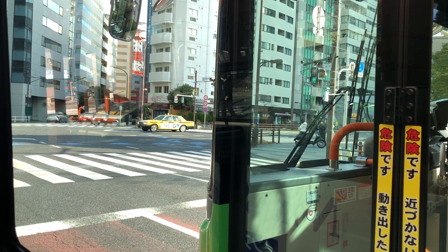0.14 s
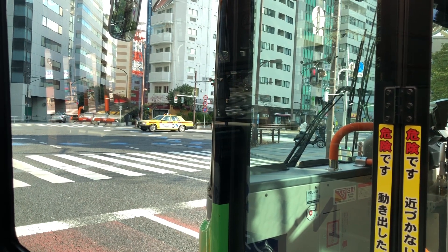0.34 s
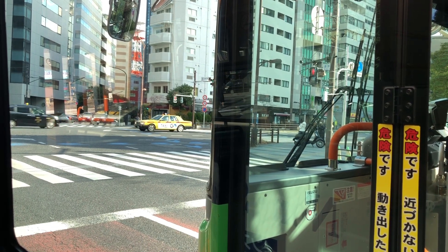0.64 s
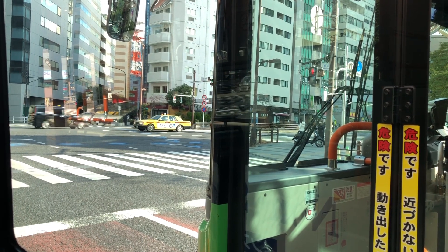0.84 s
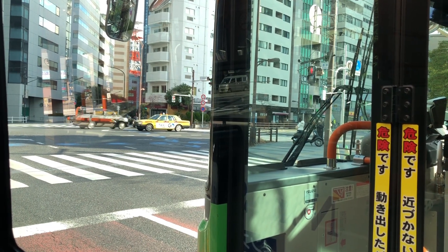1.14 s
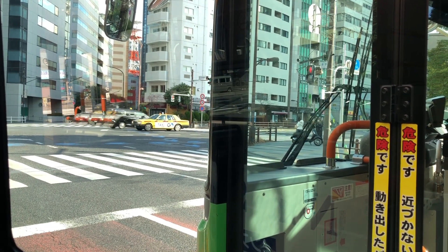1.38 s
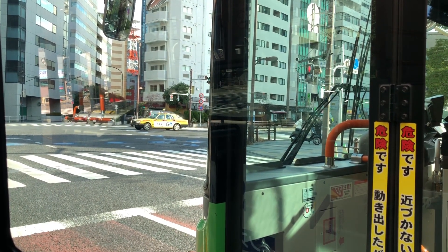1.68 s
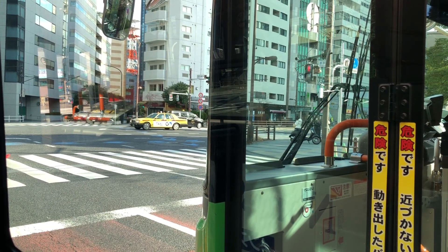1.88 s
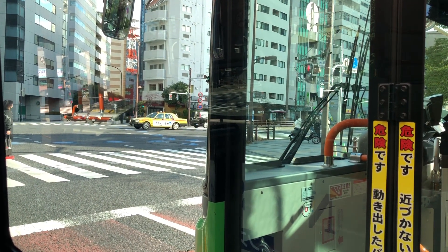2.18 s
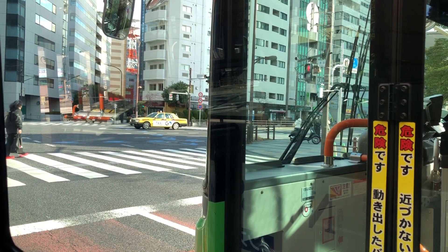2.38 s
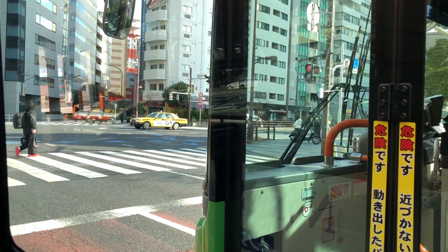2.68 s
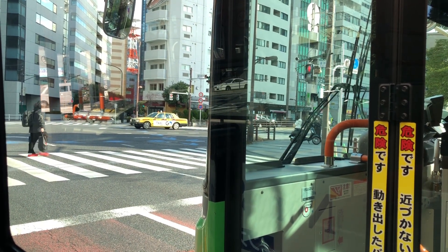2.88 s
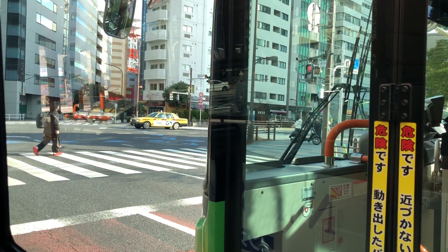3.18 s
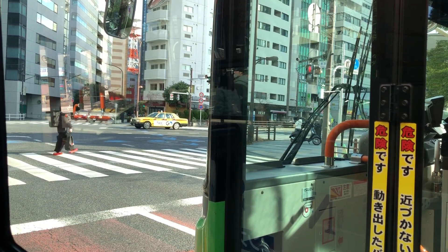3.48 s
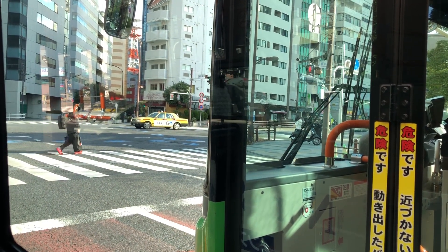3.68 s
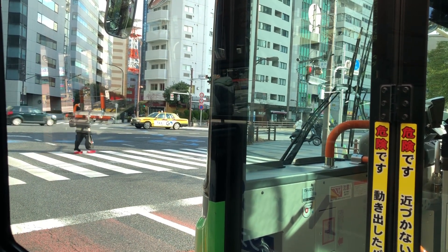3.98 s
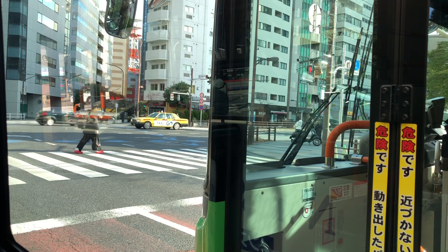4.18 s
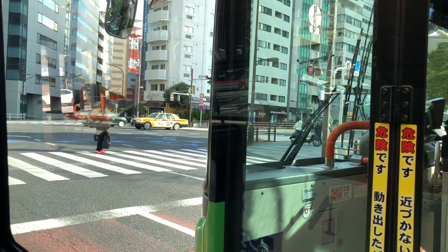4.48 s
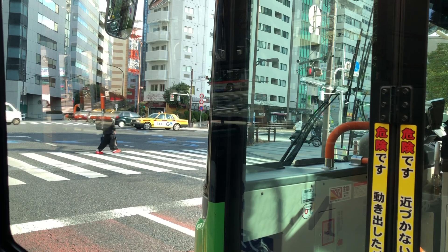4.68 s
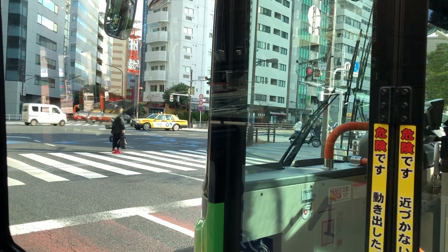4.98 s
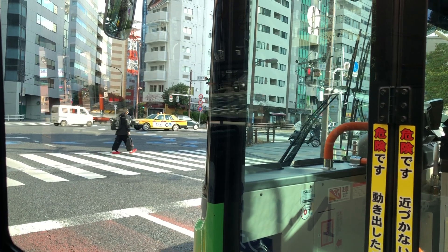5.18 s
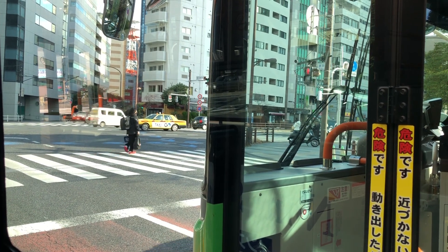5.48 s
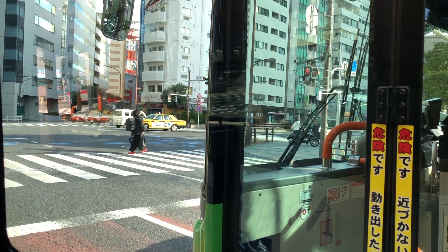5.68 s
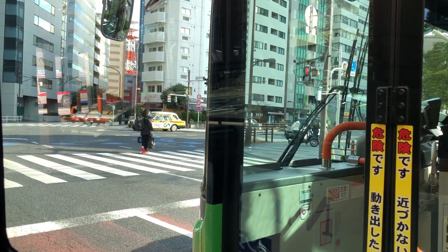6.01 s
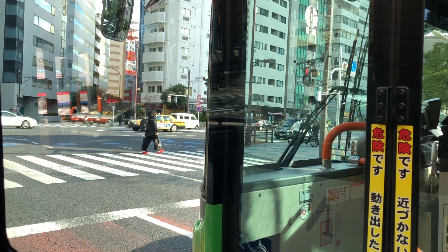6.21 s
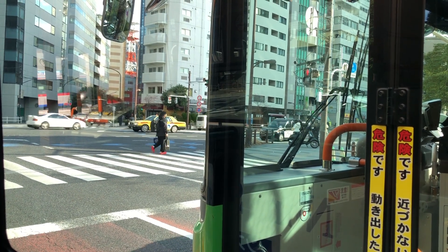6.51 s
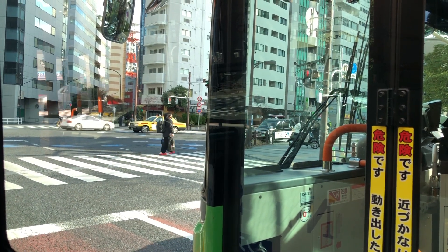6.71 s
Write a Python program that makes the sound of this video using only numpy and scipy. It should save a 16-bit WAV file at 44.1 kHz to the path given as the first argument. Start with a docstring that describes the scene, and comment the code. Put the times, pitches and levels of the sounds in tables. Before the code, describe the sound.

Heard from a seat inside a waiting bus: continuous low engine hum, slowly throbbing, with rapid even clattering at idle. Ventilation rumble and slight hiss fill the enclosed cabin. Muffled low notes of cars swell and fade outside. After a tiny high squeak near the start, a single soft but prominent knock on a hollow panel comes around two and a half seconds, then the idle simply continues.

```python
"""A low diesel drone and a rapid clatter fill a waiting city bus; traffic hums past outside.
Harmonics of the firing rate form the drone, and each firing sets off a burst of shaped noise as clatter.
Filtered noise makes the cabin rumble, hums and hiss; gliding narrow-band tones make the passing cars.
Noise bursts make faint relay ticks and brake squeaks; decaying sines and a soft rustle make one bump on
a hollow panel."""
import sys
import numpy as np
from scipy import signal
from scipy.fft import rfft, irfft
from scipy.io import wavfile

SR = 44100
rng = np.random.default_rng(int(sys.argv[2]) if len(sys.argv) > 2 else 0)


def materialize(psi):
    """Save the field psi as 16-bit PCM at rate SR to the path in sys.argv[1].

    A 1-D psi becomes a single channel; in a 2-D psi each row is a channel.
    """
    bounded = np.clip(np.atleast_2d(psi).T, -1, 1)
    quanta = np.round(bounded * 32767).astype(np.int16)
    wavfile.write(sys.argv[1], SR, quanta)


N = 302085
TIME = np.arange(N) / SR
FIRING_HZ = 19.168  # mean firing rate at idle
FIRST_FIRING_S = 0.018


def amp(db):
    """Level law: amplitude gain is ten to the power of decibels over twenty."""
    return 10 ** (np.asarray(db) / 20)


def unit(x):
    """Normalization: scales a signal to rms 1."""
    return x / np.sqrt(np.mean(abs(x) ** 2) + 1e-30)


def noise(spectrum, ripple_db=2.0, ripple_hz=22):
    """Spectral shaping: white noise takes a given density, rippled by the cabin's many reflections."""
    hz, db = np.transpose(spectrum)
    bins = np.fft.rfftfreq(N, 1 / SR)
    knots = np.arange(0, SR, ripple_hz)
    fade_in = np.clip(bins / 600 - 0.5, 0, 1)  # no ripple below 300 Hz, full from 900 Hz
    ripple = np.interp(bins, knots, rng.standard_normal(len(knots))) * fade_in
    density_db = np.interp(np.log(bins + 1), np.log(hz), db) + ripple_db * ripple
    white = rfft(rng.standard_normal(N))
    # the factor turns the density of white noise into one per Hz
    return irfft(white * amp(density_db), N) * np.sqrt(SR / 2)


def band(hz, width):
    """Resonant filtering: noise of rms 1 in one steep band; at 0 Hz it is a slow drift."""
    offset = (np.fft.rfftfreq(N, 1 / SR) - hz) / (width / 2)
    white = rfft(rng.standard_normal(N))
    return unit(irfft(white / (1 + offset ** 4), N))


def burst(age, rise, t60):
    """Exponential build-up and decay: rise is a time constant, t60 the time to fall by 60 dB."""
    age = np.maximum(age, 0)
    return (1 - np.exp(-age / rise)) * amp(-60 * age / t60)


# Harmonics of the cabin drone.
# Each row: order as a multiple of the firing rate, level in dB.
DRONE_ORDERS = [(2, -51.5), (3, -43), (5, -41.5), (6, -49.5), (7, -29.5), (8, -42), (8.5, -53), (9, -53),
                (9.5, -64), (10, -53), (11, -41), (11.5, -50.5), (12, -52), (13, -61.5), (15, -56),
                (16, -51), (18, -52.5), (19, -59), (20, -62), (21, -53.5), (22, -59.5), (24, -53.5),
                (25, -57.5), (28, -59.5), (30, -61)]


def drone(turns, smear=0.02243, waver=0.086, loose=0.022, loose_hz=7):
    """Causal filtering: firing pulses ring through the body, and higher orders come later and less steadily."""
    order, db = np.transpose(DRONE_ORDERS)
    whole = order % 1 == 0
    grid = np.arange(257) / 4  # in orders
    log_gain = np.interp(grid, order[whole], db[whole]) * np.log(10) / 20
    # minimum phase: the phase lag is the Hilbert transform of the log gain
    mirrored = np.r_[log_gain, log_gain[-2:0:-1]]
    minimum_lag = signal.hilbert(mirrored).imag[:len(grid)]
    lags = np.interp(order, grid, minimum_lag) + smear * order ** 2  # radians
    out = np.zeros(N)
    for k, level_db, lag in zip(order, db, lags):
        jitter = loose * k * band(0, loose_hz)  # radians
        strength = amp(level_db) * (1 + waver * band(0, 2.3))
        out += strength * np.cos(2 * np.pi * k * turns - lag + jitter)
    return np.sqrt(2) * out


def throb(turns, level_db=-42.0, other_db=-46.0, beat_hz=0.79, order=14):
    """Beating: a second tone just above one engine order makes the two swell and cancel slowly."""
    phase = 2 * np.pi * order * turns
    engine_tone = amp(level_db) * np.cos(phase)
    other_tone = amp(other_db) * np.cos(phase + 2 * np.pi * beat_hz * TIME)
    return np.sqrt(2) * (engine_tone - other_tone)


# Noise spectrum of the injector and valve clatter.
# Each row: frequency in Hz, density in dB per Hz.
CLATTER_SPECTRUM = [(150, -99), (400, -75), (700, -86), (950, -75), (1500, -83), (2100, -89), (3000, -94),
                    (3500, -92), (4200, -97), (6300, -100.5), (7300, -104), (9200, -103), (10300, -111),
                    (11500, -114), (15500, -114)]


def clatter(turns, rise=0.0092, t60=0.19, uneven_db=0.5):
    """Amplitude modulation: each firing sets off an uneven noise burst whose tail runs under the next."""
    strengths = amp(uneven_db * rng.standard_normal(int(turns[-1]) + 3))
    strength = strengths[np.floor(turns).astype(int) + 1]
    age = turns % 1 / FIRING_HZ  # seconds since the latest firing
    latest = burst(age, rise, t60)
    previous = burst(age + 1 / FIRING_HZ, rise, t60)
    # unrelated noises add by power
    return noise(CLATTER_SPECTRUM) * unit(strength * np.hypot(latest, previous))


# Fan hums and ringing resonances of the cabin.
# Each row: frequency in Hz, width in Hz, level in dB.
CABIN_HUMS = [(190.5, 15.4, -44.5), (232.1, 5.1, -49), (695.6, 8.3, -56.5), (751, 31, -59), (904, 113, -52),
              (1040, 45, -62), (1340, 10, -68), (1530, 89, -57.5), (2954, 340, -61.5), (3140, 30, -77),
              (4170, 120, -69)]
# Road and ventilation noise in the cabin.
# Each row: frequency in Hz, density in dB per Hz.
CABIN_SPECTRUM = [(20, -93), (40, -57.5), (120, -59), (185, -53.5), (250, -58.5), (310, -66.5),
                  (470, -68.5), (740, -74.5), (1000, -73), (2150, -83.5), (3000, -83.5), (3500, -90.5),
                  (11000, -107.5), (15500, -105)]


def cabin(swell_db=0.29, flicker_db=1.5, hiss_db=-70):
    """Superposition: broad rumble, a few wavering resonant hums and a thin, flickering hiss add up."""
    rumble = noise(CABIN_SPECTRUM) * amp(swell_db * band(0, 4.5))
    hums = sum(amp(db) * band(hz, width) for hz, width, db in CABIN_HUMS)
    hiss = band(5200, 11000) * amp(hiss_db + flicker_db * band(0, 20))
    return rumble + hums + hiss


# Cars that cross, speeding up or easing off.
# Each row: start in seconds, length in seconds, first pitch in Hz, last pitch in Hz, level in dB.
PASSING_CARS = [(-0.2, 1.08, 102.4, 91.4, -37.5), (1.099, 1.62, 89, 79.7, -37),
                (2.652, 0.76, 77, 81.6, -38), (3.099, 1.27, 86.5, 106.3, -38), (4.2, 0.6, 104, 90.9, -32.5),
                (4.946, 1, 69.8, 70.1, -35), (6.303, 0.8, 73, 77.6, -41)]


def traffic(waver=0.27, waver_hz=10, fade_s=0.31):
    """Transmission loss: only low exhaust notes get through the glass; each swells, glides and fades."""
    out = np.zeros(N)
    for start, length, first_hz, last_hz, db in PASSING_CARS:
        age = TIME - start
        hz = first_hz + (last_hz - first_hz) * age / length
        swell = np.clip(np.minimum(age, length - age) / fade_s, 0, 1)
        # complex drift wavers both strength and phase
        unsteady = 1 + waver * (band(0, waver_hz) + 1j * band(0, waver_hz))
        note = (unsteady * np.exp(2j * np.pi * np.cumsum(hz) / SR)).real
        out += amp(db) * swell * note
    return np.sqrt(2) * out


FIRST_BLINK_S, BLINK_S = 0.038, 0.7112  # first closing and blink period
LAMP_ON_S = 0.361  # from closing to opening
CLOSE_DB, OPEN_DB = -57.5, -59


def relay(ring_hz=15300, width_hz=800, rise=0.01, t60=0.14):
    """Impulsive excitation: the indicator relay's contacts close, then open more softly, as high ticks."""
    ticks = np.zeros(N)
    for close_s in np.arange(FIRST_BLINK_S, TIME[-1], BLINK_S):
        ticks += amp(CLOSE_DB) * burst(TIME - close_s, rise, t60)
        ticks += amp(OPEN_DB) * burst(TIME - close_s - LAMP_ON_S, rise, t60)
    return band(ring_hz, width_hz) * ticks


# Brake squeaks.
# Each row: start in seconds, time to fall by 15 dB in seconds, pitch in Hz, level in dB.
BRAKE_SQUEAKS = [(.56, 0.04, 7150, -54), (.71, 0.47, 10500, -68), (.76, .5, 11600, -73),
                 (1.153, .6, 9750, -78), (5.93, .2, 15040, -67), (6.01, .1, 13300, -71)]


def brake(width_hz=260, flutter_db=3):
    """Narrow-band noise: squeaks start quickly, flutter together and fade exponentially."""
    squeaks = np.zeros(N)
    for start, fall_15db_s, hz, db in BRAKE_SQUEAKS:
        squeaks += amp(db) * band(hz, width_hz) * burst(TIME - start, 0.013, 4 * fall_15db_s)
    return squeaks * amp(flutter_db * band(0, 30))


def rustle(middle_s=2.5, half_length_s=0.18, level_db=-60, air_db=-67):
    """Windowed noise: a smooth swell of two high bands makes a soft, airy rustle around the bump."""
    swell = np.exp(-((TIME - middle_s) / half_length_s) ** 4)
    return swell * (amp(level_db) * band(5160, 5000) + amp(air_db) * band(12000, 8000))


# Bumps on the panel.
# Each row: time in seconds, strength in dB.
PANEL_BUMPS = [(2.4562, -0.5), (2.4609, 5.5), (2.4853, -5)]
# Modes of the hollow panel.
# Each row: frequency in Hz, level in dB at a bump of 0 dB, time to fall by 60 dB in seconds.
PANEL_MODES = [(147, -23, 0.22), (158.7, -8.5, 0.2), (182.5, -3, 0.1), (222, -7.5, 0.073),
               (263, -21.5, 0.16), (519, -33, 0.14), (622, -38, 0.11)]


def knock(rise=0.016, rattle_db=-41, scuff_db=-42, rattle_t60=0.18):
    """Modal synthesis: soft bumps ring the panel's decaying modes and shake its loose trim."""
    ring, shake = np.zeros(N), np.zeros(N)
    for start, strength_db in PANEL_BUMPS:
        age = TIME - start
        for hz, db, t60 in PANEL_MODES:
            ring += amp(strength_db + db) * burst(age, rise, t60) * np.sin(2 * np.pi * hz * age)
        shake += amp(strength_db) * burst(age, 0.018, rattle_t60)
    trim = amp(rattle_db) * band(1800, 1860) + amp(scuff_db) * band(410, 450)
    return ring + shake * trim


def scene(hunt=0.0053):
    """Common phase: the idle hunts a little, and drone, throb and clatter follow one count of firings."""
    turns = FIRING_HZ * (TIME - FIRST_FIRING_S) + hunt * band(0, 2.3)  # in firings
    engine = drone(turns) + throb(turns) + clatter(turns)
    inside = cabin() + relay() + rustle() + knock()
    return (engine + inside + traffic() + brake())[None]


def record(dry, edge_hz=15780):
    """Band limiting: a linear-phase low-pass removes the extreme treble; short fades keep the ends click-free."""
    ends = np.clip(np.minimum(TIME, TIME[-1] - TIME) / 0.003, 0, 1)
    low_pass = signal.firwin(1023, edge_hz, window=("kaiser", 9), fs=SR)
    return signal.oaconvolve(dry * ends, low_pass[None], "same")


dry = scene()
out = record(dry)
materialize(out)
```